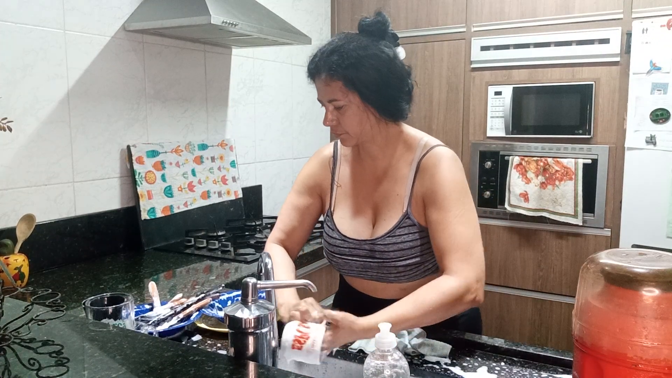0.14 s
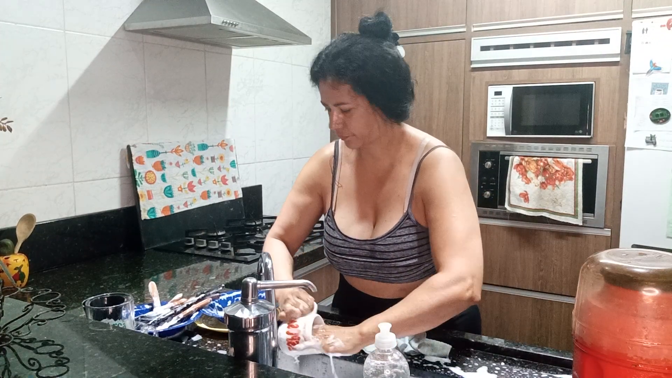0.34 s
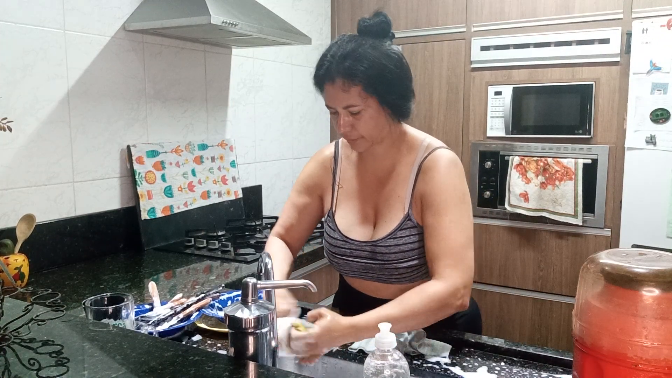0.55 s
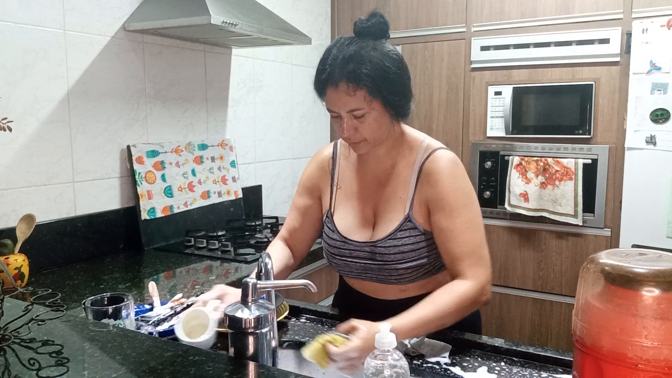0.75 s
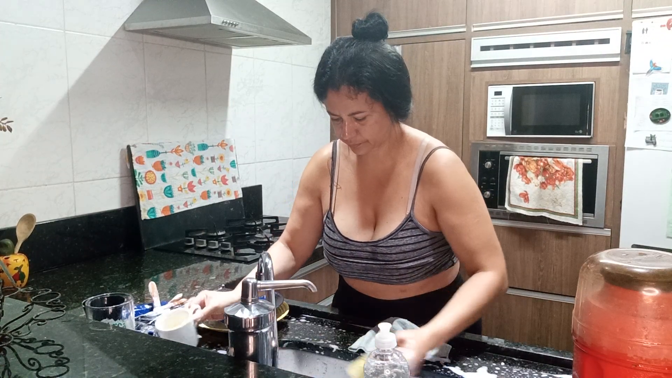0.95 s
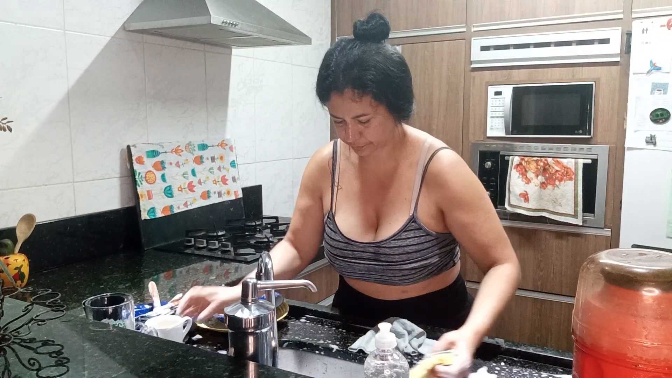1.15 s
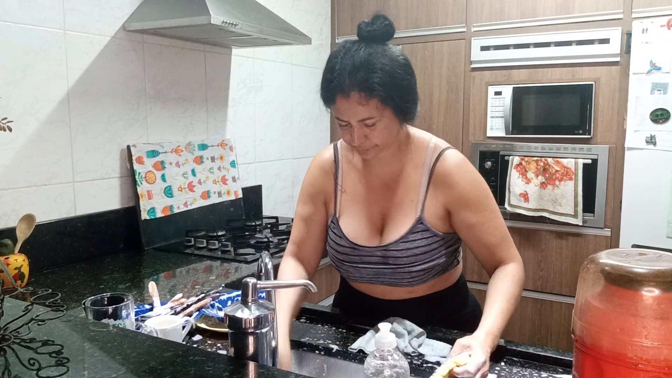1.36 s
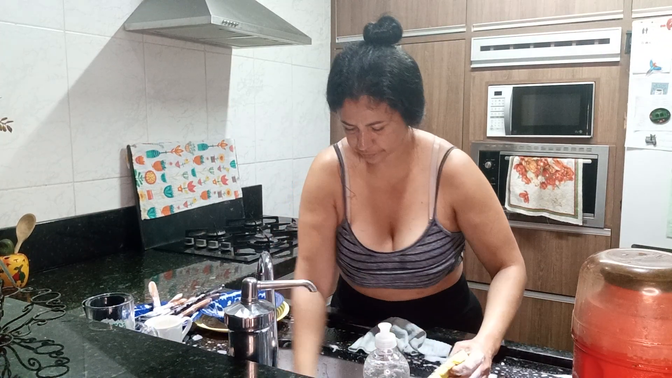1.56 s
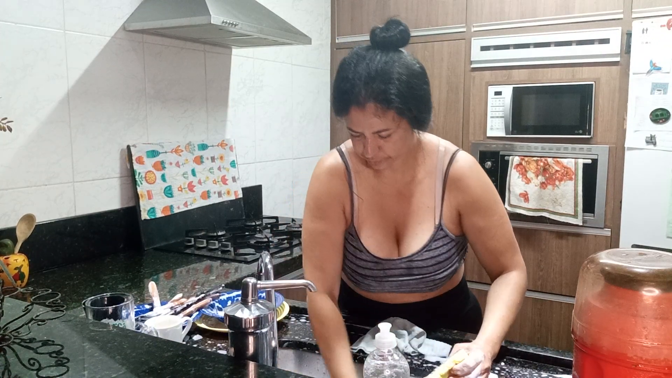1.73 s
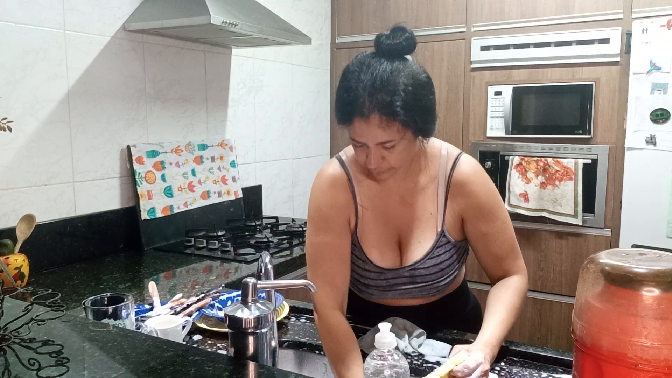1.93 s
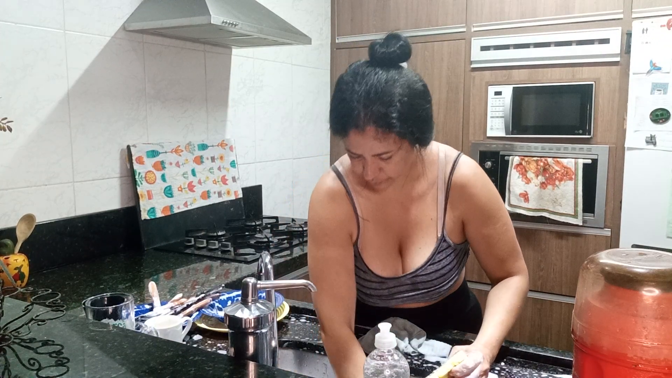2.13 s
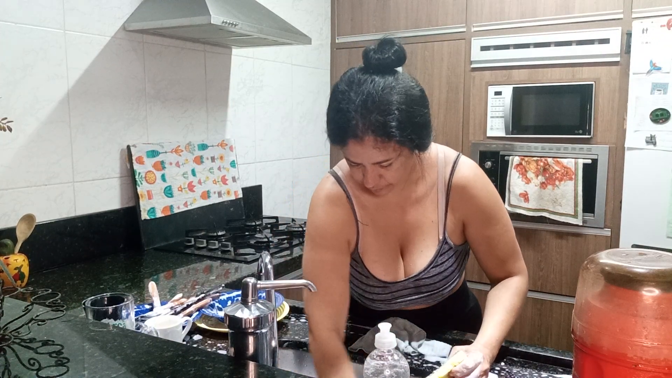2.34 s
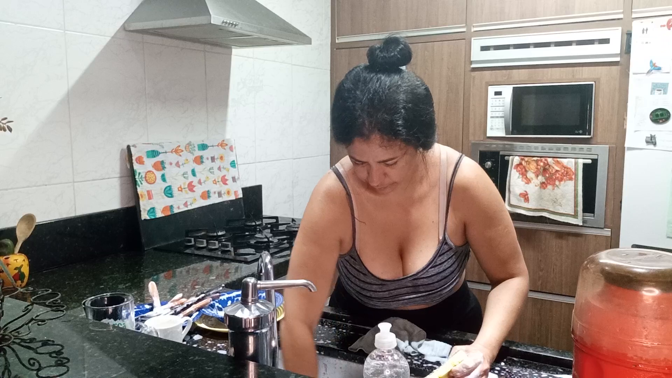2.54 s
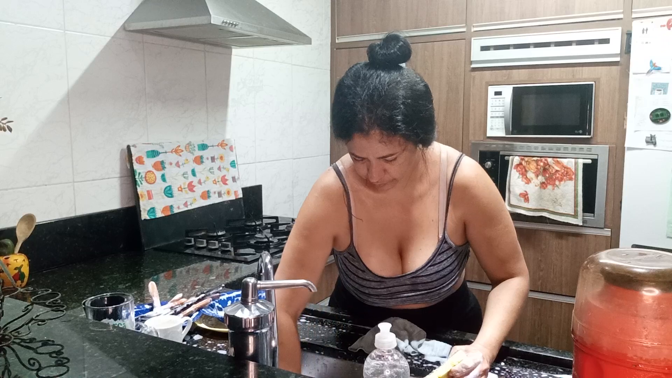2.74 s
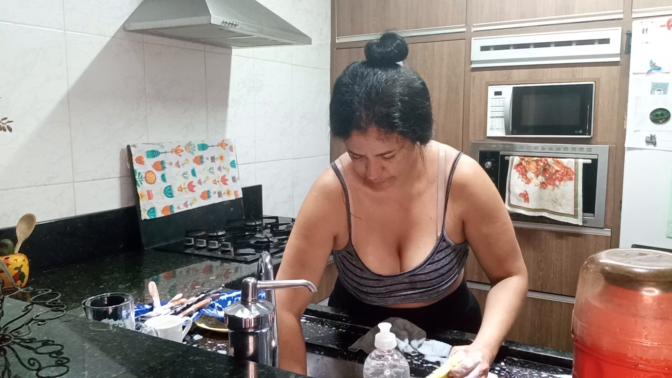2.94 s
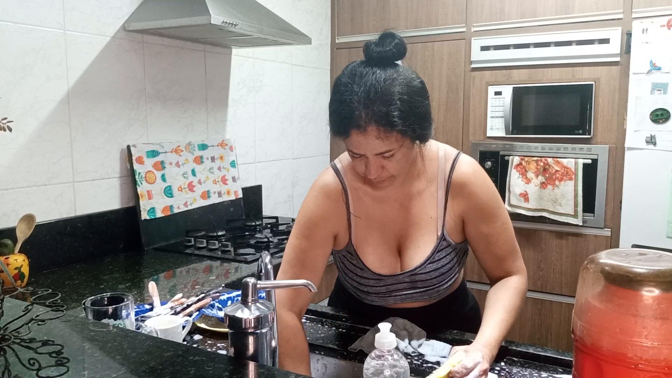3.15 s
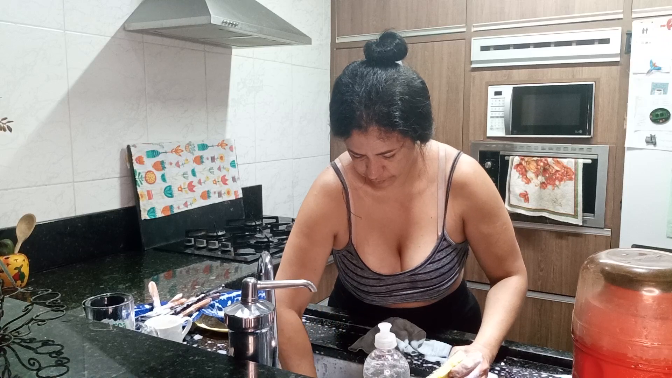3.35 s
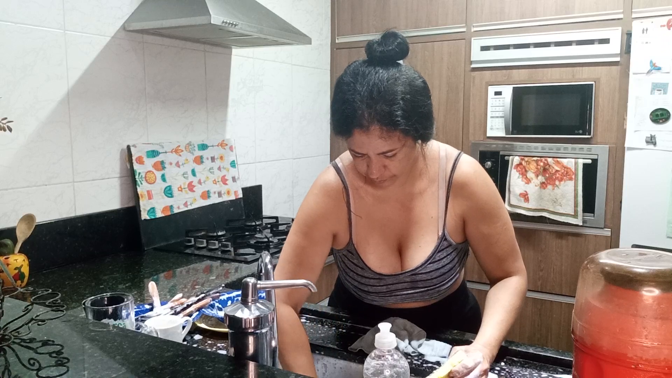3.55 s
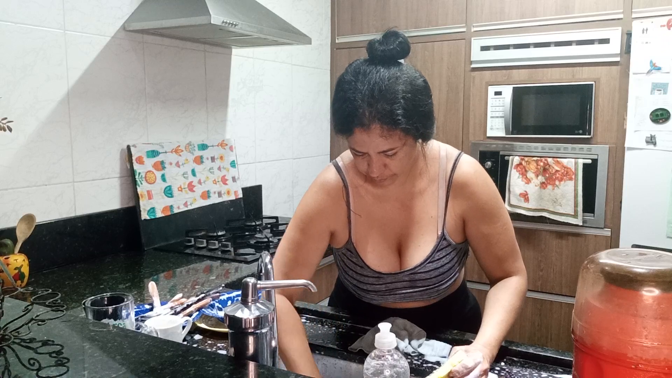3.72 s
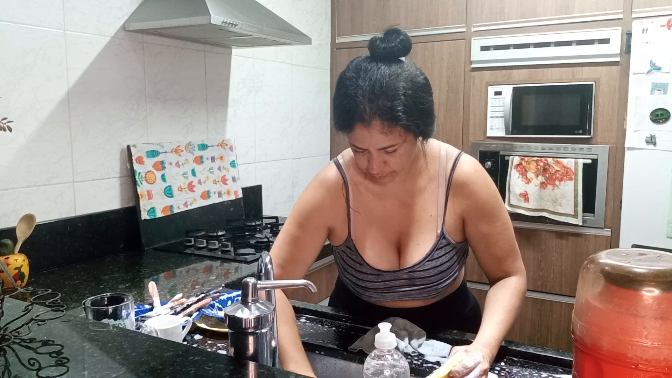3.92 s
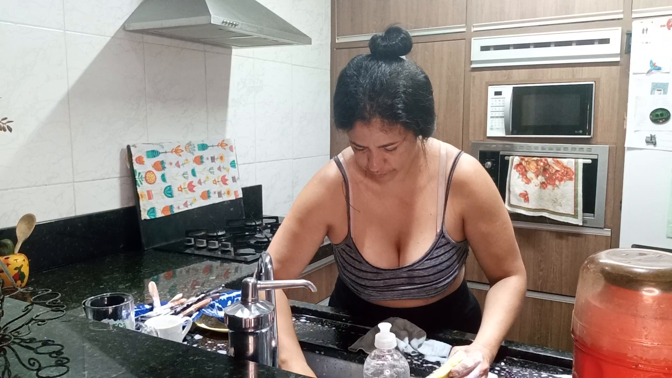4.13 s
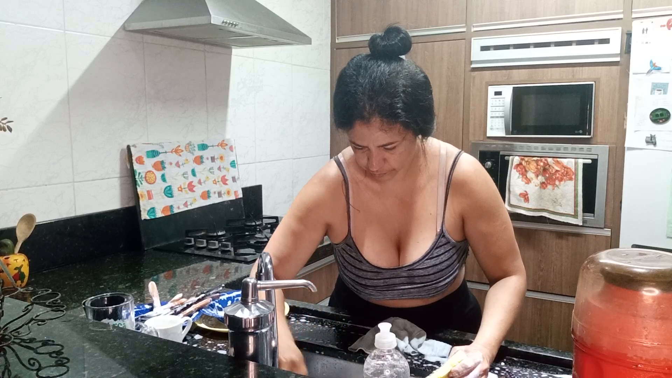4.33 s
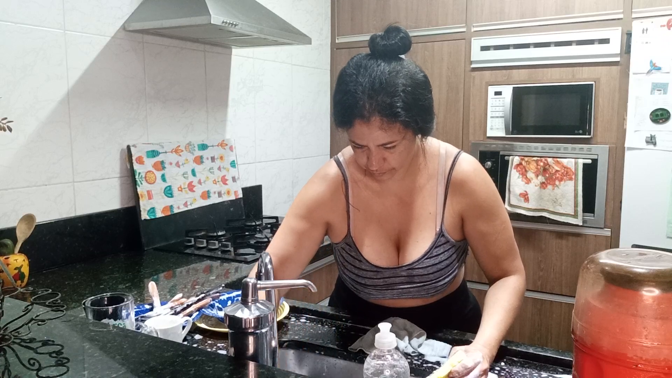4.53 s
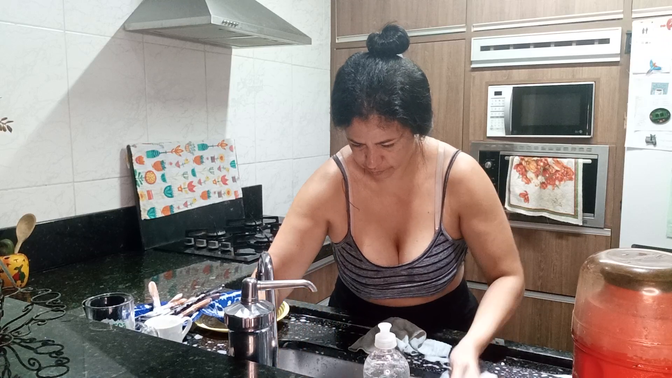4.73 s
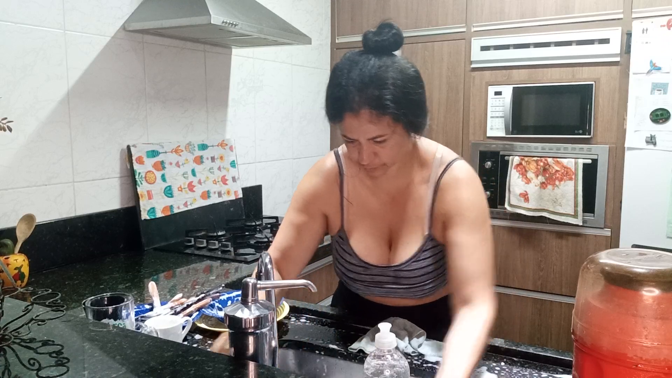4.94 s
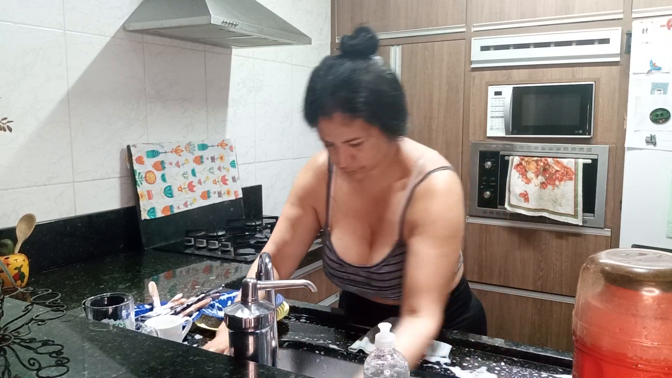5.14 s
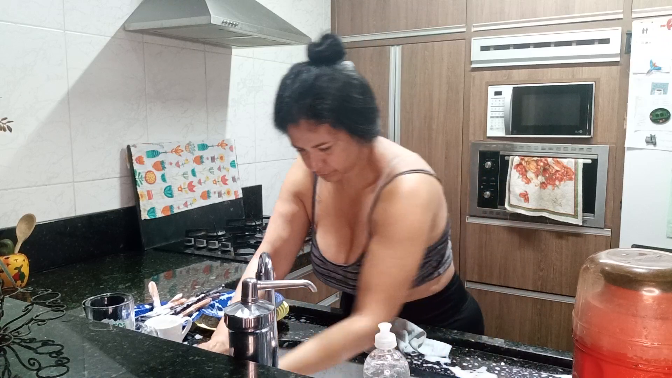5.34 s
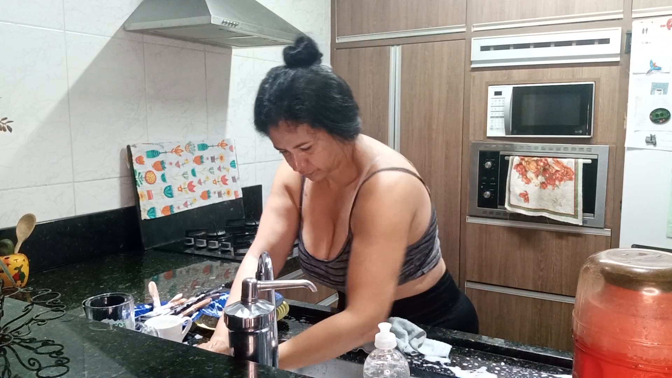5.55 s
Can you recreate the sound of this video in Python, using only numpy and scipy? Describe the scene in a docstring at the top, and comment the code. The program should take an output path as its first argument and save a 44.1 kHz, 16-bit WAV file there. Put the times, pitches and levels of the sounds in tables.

```python
"""A kitchen sink with tiled walls, where dishes are washed by hand. A soapy cup is set down hard on the stone
counter and chinks against other crockery; then hands grope in the basin, where things slide, slosh and knock.
Impacts are causal pulses (cup on stone) or decaying modes (cup, plate, crockery); rubbing and suds are coloured
random grains. Sparse, decaying echoes let the walls ring on after every blow, over room noise and a motor hum."""
import sys
import numpy as np
from scipy import signal
from scipy.fft import rfft, irfft
from scipy.io import wavfile
from scipy.ndimage import uniform_filter1d

SR = 44100
rng = np.random.default_rng(int(sys.argv[2]) if len(sys.argv) > 2 else 0)


def to_wav(sig):
    """Store sig (one row per channel, or 1-D mono) as 16-bit WAV at the path in sys.argv[1].

    Samples outside -1..1 are clipped; the rate is SR.
    """
    pcm = np.clip(np.atleast_2d(sig), -1, 1) * 32767
    pcm = np.round(pcm).astype(np.int16)
    wavfile.write(sys.argv[1], SR, pcm.T)  # frames by channels


N = 250488  # length in samples

# All levels are relative; scene() sets the balance between the layers.
# Spectrum of the room noise: f/Hz, density/dB
AIR_SPECTRUM = [(12, -42.5), (20, -24.5), (59, -10.5), (104, 3.5), (301, -3.5), (1320, -19), (1520, -12.5),
                (2450, -21.5), (3830, -23), (5980, -37.5), (6880, -28.5), (7690, -42), (9360, -31.5),
                (11700, -52), (15900, -39.5)]
AIR_DB = -63.0
HUM_HZ, HUM_DB = 59.6, -62.5  # refrigerator motor: mean frequency and level

# Reverberation of the tiled walls: f/Hz, T60/s, level/dB
WALL_BANDS = [(99.5, 0.57, -7.5), (288, 0.38, -4.5), (730, .55, 0.5), (1810, 0.51, -2.5), (4900, 0.46, -1),
              (8900, 0.15, 0.5), (15860, 0.14, -7.5)]

# Moves of the hands among the dishes: t/s of the peak, build-up/s, sliding level/dB, wet rubbing level/dB,
# suds level/dB
HAND_STROKES = [(.085, 0.079, -55.5, -61, -82), (.316, 0.14, -59.5, -64.5, -85),
                (0.515, 0.086, -53, -55, -69), (.69, .03, -72, -66, -78.5), (1.519, 0.043, -45, -63, -81),
                (1.63, 0.22, -48.5, -46, -80), (1.8, 0.33, -47.5, -47.5, -64.5),
                (2.18, 0.043, -72, -73, -90), (2.43, 0.11, -59, -69, -86),
                (2.611, 0.037, -53.5, -58.5, -70), (2.85, .02, -60.5, -69.5, -92),
                (3.02, .07, -51, -76.5, -85), (3.2, .05, -62, -80, -77), (3.551, .1, -62.5, -60.5, -91),
                (3.68, 0.13, -56.5, -63, -82), (3.83, 0.24, -44.5, -60, -80),
                (4.05, 0.058, -64.5, -68, -73), (4.18, 0.22, -72.5, -60, -84.5),
                (4.309, .12, -50.5, -60.5, -73.5), (4.65, 0.29, -56, -60, -84),
                (4.76, 0.26, -45, -65, -74.5), (4.9, 0.27, -68, -62, -88), (5.01, 0.11, -46, -56.5, -71),
                (5.15, 0.36, -72, -57, -70.5), (5.28, 0.11, -46, -57, -68), (5.39, 0.23, -48, -54, -68.5),
                (5.54, 0.75, -61, -56.5, -73.5), (5.66, 0.16, -48, -58.5, -73)]
# Spectrum of dishes sliding: f/Hz, density/dB
SLIDE_SPECTRUM = [(70, -24.5), (130, -1), (300, -1), (700, -6), (1200, -19), (2000, -36.5), (4000, -55.5)]
# Spectrum of wet rubbing: f/Hz, density/dB
RUB_SPECTRUM = [(470, -28.5), (800, -5.5), (1200, -5), (1380, -6), (1870, -6.5), (2190, -8.5), (2540, -8),
                (6500, -35), (8450, -57.5), (14300, -120)]
# Spectrum of suds bursting: f/Hz, density/dB
SUDS_SPECTRUM = [(3530, -28), (6000, -3), (8020, -6), (9100, 3), (9590, 1), (11600, -24.5), (13600, -28.5),
                 (15100, -17.5), (15900, -20)]
BUILD_DB = 16  # rise over the build-up
SLIDE_FALL_DB_S, RUB_FALL_DB_S, SUDS_FALL_DB_S = 111, 122.5, 111  # dying away after the peak, dB/s
RATTLES_PER_S, RATTLE_DB, RATTLE_T60_S = 51, -4, 0.012  # small clinks of cutlery under the rubbing hands

# Knocks of assorted crockery, cutlery and basin: t/s, level/dB, f/Hz, T60/s, level/dB of the contact tick
# (3 dB is added to the tick)
CROCKERY_KNOCKS = [(0.06, -50, 314, 0.083, -92), (0.093, -45, 1750, 0.031, -66),
                   (0.255, -35, 301, 0.026, -85), (0.301, -47, 1035, 0.076, -67),
                   (0.481, -38.5, 679, 0.028, -77), (0.498, -23, 3230, 0.0023, -58),
                   (0.501, -40, 322, 0.067, -87), (0.513, -55, 2230, 0.032, -65),
                   (0.674, -43.5, 2270, 0.0073, -70), (0.816, -11.5, 367, 0.043, -93),
                   (0.817, -69, 11450, 0.12, -91), (1.083, -23, 1500, .01, -46),
                   (1.089, -19.5, 1006, 0.048, -84.5), (1.124, -36, 920, 0.036, -89.5),
                   (1.456, -34.5, 331.7, 0.57, -59), (1.458, -25.5, 735, 0.01, -87),
                   (1.531, -42.5, 3300, 0.01, -75), (1.54, -49, 8700, 0.005, -53.5),
                   (1.604, -61, 6000, 0.0026, -56), (1.644, -36, 1300, 0.013, -80.5),
                   (1.684, -31, 460, 0.016, -71), (1.727, -37.5, 1173, 0.029, -68),
                   (1.743, -43.5, 354, 0.44, -49), (1.75, -37.5, 2010, 0.018, -90),
                   (1.782, -20, 2720, 0.0037, -54), (1.801, -42, 1890, 0.032, -79),
                   (2.16, -52, 3400, 0.012, -73), (2.329, -59.5, 4980, 0.0087, -68.5),
                   (2.35, -56, 125.8, 0.4, -67.5), (2.419, -60, 4960, 0.005, -70.5),
                   (2.564, -45.5, 1670, 0.03, -82.5), (2.599, -49, 1370, 0.03, -58.5),
                   (2.615, -41, 2560, .012, -76.5), (2.619, -48.5, 3010, 0.015, -90),
                   (2.759, -66, 4720, 0.0073, -67.5), (2.85, -49, 2137, 0.021, -76),
                   (2.989, -56, 4220, 0.009, -70), (2.995, -48, 670, 0.027, -80),
                   (3.025, -43, 302, 0.045, -77.5), (3.459, -49.5, 3250, 0.017, -69),
                   (3.523, -48.5, 1790, 0.014, -89.5), (3.535, -47, 577, 0.024, -83),
                   (3.607, -50, 1864, 0.033, -74), (3.68, -47, 1340, 0.019, -86),
                   (3.721, -48, 368, 0.1, -76), (3.76, -40, 765, 0.048, -87),
                   (3.832, -46.5, 433, 0.13, -71), (3.833, -53.5, 5270, 0.0086, -94),
                   (3.846, -45.5, 890, 0.038, -84), (3.897, -43, 1033, 0.019, -86),
                   (3.93, -58, 8500, 0.0052, -66), (3.977, -52.5, 1390, 0.024, -91),
                   (4.036, -32, 3440, 0.0039, -60.5), (4.088, -48.5, 2125, 0.026, -62),
                   (4.245, -40, 220, 0.043, -67), (4.25, -46, 2090, 0.025, -95),
                   (4.305, -40.5, 1257, 0.024, -82), (4.718, -17, 423, 0.0095, -49),
                   (4.78, -52, 64.2, 0.57, -61), (5.0, -32.5, 267, 0.023, -56),
                   (5.258, -33.5, 314, 0.11, -57), (5.323, -55, 302, 0.027, -67),
                   (5.335, -29.5, 953, 0.011, -56), (5.614, -24, 230, 0.019, -90),
                   (5.631, -37.5, 163.5, 0.11, -79)]
# Blows on a small plate in the basin: t/s, level/dB
PLATE_BLOWS = [(4.716, -24.5)]
# Modes of the plate: f/Hz, level/dB, T60/s
PLATE_MODES = [(1400, -23.5, 0.0061), (2480, 0, 0.0098), (2897, -4, 0.017), (3040, 4.5, 0.017),
               (3250, -23, .2), (2344, -9.5, 0.0062)]
# Spectrum of the contact ticks: f/Hz, density/dB
TICK_SPECTRUM = [(300, -10), (1000, 4.5), (3000, 6), (5500, -0.5), (8000, -9.5), (9200, -3), (11500, -25),
                 (15000, -18.5)]

# Blows of the cup on the stone: t/s, level/dB
CUP_LANDINGS = [(.818, -3), (1.09, -11), (1.113, -25), (1.135, -17.5), (1.255, -30)]
# Spectrum of thick ceramic on stone: f/Hz, density/dB
STONE_SPECTRUM = [(35, -55.5), (85, -26.5), (156, -5.5), (514, -11.5), (578, -10), (713, -7), (783, -9.5),
                  (1090, -6), (1580, -8), (2460, -13.5), (3250, -20.5), (4720, -47), (11700, -64),
                  (13500, -73.5), (15900, -68)]
GRAZE_S, GRAZE_DB = 0.002527, -17.5  # an edge touches this long before the blow
REBOUND_S, REBOUND_DB, REBOUND_FADE_DB = .0102, -15, -2  # chatter of the base: spacing, first level, change at each

# Blows on the rim of the cup: t/s, level/dB
RIM_BLOWS = [(1.086, -9), (1.114, 7)]
# Lower member of each mode pair of the cup: f/Hz
CUP_MODE_HZ = [1641, 3090, 3932, 5120, 5681, 7483, 8796, 9230, 10150, 10840, 12095, 13722, 14959, 15706]
# Beating of each mode pair: level/dB, T60/s, beat f/Hz, signed relative height of the twin
CUP_MODE_PAIRS = [(-16, 0.53, 7.65, -0.52), (-40, 0.44, 12, 0.81), (-33, 0.45, 10.5, 0.75),
                  (-49.5, 0.39, 2.5, 0.92), (-50, 0.45, 7.5, -0.52), (-49.5, 0.53, 12, -0.5),
                  (-58.5, 0.27, 9, .3), (-46, 0.4, 9.4, 0.63), (-57, .34, 7.4, -.35), (-56, .35, 13, 0.25),
                  (-62.5, 0.28, 16, 0.14), (-76, .3, 4, 0.2), (-70.5, .3, 4, 0.63), (-69.5, .3, 3, .4)]
# Spectrum of glaze cracking against glaze: f/Hz, density/dB
CRACK_SPECTRUM = [(1500, -33), (3000, 3), (5000, -4), (7000, -19.5), (9200, -5.5), (12000, -24.5),
                  (15000, -22.5)]
CRACK_DB = -43
SETTLE_S, SETTLE_DB_S, SETTLED_DB = 1.33, 301, -10  # the cup comes to rest: lowest pair damped from t, rate, floor

EDGE_HZ = 15900  # upper band limit


def amp(db):
    """Level definition: converts decibels to an amplitude ratio."""
    return 10 ** (np.asarray(db) / 20)


def evened(x):
    """Power normalisation: scales to rms 1."""
    return x / np.sqrt(np.mean(x ** 2) + 1e-20)


def read(points, hz, column=1):
    """Logarithmic frequency scale: interpolates a table column along it."""
    rows = np.transpose(points)
    return np.interp(np.log(hz + 1), np.log(rows[0] + 1), rows[column])


def add(mix, s, sound):
    """Superposition: adds a sound into the mix at second s."""
    part = mix[round(s * SR):][:len(sound)]
    part += sound[:len(part)]


def coloured(x, spectrum):
    """Linear filtering: shapes a long signal by a spectrum, to rms 1."""
    gain = amp(read(spectrum, np.fft.rfftfreq(len(x), 1 / SR)))
    return evened(irfft(rfft(x) * gain, len(x)))


def air():
    """Stationary noise of the room, and a motor hum under slow amplitude and frequency modulation."""
    noise = rng.standard_normal((2, N))
    waver = evened(uniform_filter1d(uniform_filter1d(noise, 3000), 3000))
    phase = 2 * np.pi * np.cumsum(HUM_HZ + 1.3 * waver[1]) / SR
    hum = amp(HUM_DB + 1.4 * waver[0]) * np.sin(phase)
    return amp(AIR_DB) * coloured(rng.standard_normal(N), AIR_SPECTRUM) + hum


def kitchen(x):
    """Reverberation: sparse echoes of random sign, each band decaying at its own rate; three tails take turns."""
    at = np.arange(100, SR // 2 + 8000, 20) + rng.integers(0, 20, (3, 1498))
    taps = np.zeros((3, SR))
    np.put_along_axis(taps, at, rng.choice([-1., 1.], at.shape), 1)
    hz, t, bands = signal.stft(taps, SR, nperseg=256)
    level_db = read(WALL_BANDS, hz, column=2)[:, None]
    decay_db = 60 * t / read(WALL_BANDS, hz)[:, None]
    tails = signal.istft(bands * amp(level_db - decay_db), SR, nperseg=256)[1]
    tails[:, :100] = 0  # no echo before the first reflection
    turn = np.arange(N) / SR * 2 * np.pi * 1.3 + np.arange(3)[:, None] * np.pi / 3
    echoes = signal.fftconvolve(x * np.cos(turn), tails / np.linalg.norm(tails[0]), axes=1)
    return echoes[:, :N].sum(0)


def rattle():
    """Random excitation of damped resonators: sparse small clinks at a dozen pitches, rms 1."""
    t, hz = np.arange(SR // 20) / SR, np.geomspace(900, 3100, 12)
    struck = rng.random((len(hz), N)) < RATTLES_PER_S / len(hz) / SR
    blows = struck * rng.standard_normal((len(hz), N))
    rise = np.minimum(t / 0.0008, 1)
    rings = amp(-60 * t / RATTLE_T60_S) * np.sin(2 * np.pi * hz[:, None] * t) * rise
    return evened(signal.oaconvolve(blows, rings, axes=1)[:, :N].sum(0))


def hands(slips_per_s=900, pops_per_s=1200, size_db=4, smooth=.8):
    """Stick-slip friction of sliding dishes below, wet rubbing and bursting suds above, swelling at each move."""
    size = amp(size_db * np.minimum(rng.exponential(1, (2, N)), 4)) * rng.standard_normal((2, N))
    grains = size * (rng.random((2, N)) < np.array([[slips_per_s], [pops_per_s]]) / SR)
    slips, pops = (evened(g) + smooth * rng.standard_normal(N) for g in grains)
    foam = pops + 2.5 * rng.standard_normal(N)  # the finest bubbles merge into hiss
    t, power = np.arange(0, N / SR + .01, .002), 0
    falls = np.array([[SLIDE_FALL_DB_S], [RUB_FALL_DB_S], [SUDS_FALL_DB_S]])
    for s, build_s, *levels_db in HAND_STROKES:
        tops_db = np.array(levels_db)[:, None]
        before_db = BUILD_DB * np.maximum(s - t, 0) / abs(build_s)
        after_db = falls * np.maximum(t - s, 0)
        power = power + amp(tops_db - before_db - after_db) ** 2
    slide_gain, rub_gain, suds_gain = [np.interp(np.arange(N) / SR, t, np.sqrt(p)) for p in power]
    sliding = slide_gain * coloured(slips, SLIDE_SPECTRUM)
    rubbing = rub_gain * (coloured(pops, RUB_SPECTRUM) + amp(RATTLE_DB) * rattle())
    return sliding + rubbing + suds_gain * coloured(foam, SUDS_SPECTRUM)


def knocks(side_db=-6):
    """Modal decay: a damped mode, a quicker neighbour and a tick; gives near sound and what reaches the walls."""
    t, out = np.arange(SR // 3) / SR, np.zeros((2, N))
    grit = coloured(rng.standard_normal(N), TICK_SPECTRUM)
    plate = [(s, db + d, hz, t60, -np.inf) for s, db in PLATE_BLOWS for hz, d, t60 in PLATE_MODES]
    rows = CROCKERY_KNOCKS + plate
    nearby = rng.uniform(.92, 1.08, (len(rows), 1))  # frequency ratio of the neighbour
    for (s, db, hz, t60, tick_db), near in zip(rows, nearby):
        fade = amp(-60 * t / max(t60, .002))
        neighbour = amp(side_db) * fade * np.sin(2 * np.pi * hz * near * t)
        ring = np.sin(2 * np.pi * hz * t) + neighbour
        rise = np.sin(np.pi / 2 * np.minimum(t / (0.0012 + 1.0 / hz), 1)) ** 2  # the blow is soft and wet
        sound = amp(db) * ring * fade * rise
        tick_gain = amp(tick_db + 3 - 60 * t / 0.02) * np.minimum(t / 0.00069, 1)
        tick = tick_gain * np.roll(grit, -round(s * SR))[:len(t)]
        add(out[0], s, sound + tick)
        # long low rings stay in the basin and counter
        add(out[1], s, sound * min(0.11 / t60, hz / 600, 1) + tick)
    return out


def landings():
    """Minimum-phase impact: each contact is a short causal pulse, dull as ceramic on stone; graze, blow, rebounds."""
    density_db = read(STONE_SPECTRUM, abs(np.fft.fftfreq(4096, 1 / SR)))
    log_gain = np.log(amp(np.maximum(density_db, -100)))
    pulse = np.fft.ifft(np.exp(log_gain - 1j * signal.hilbert(log_gain).imag)).real[:2048]
    pulse = pulse / abs(pulse).max()
    out, k = np.zeros(N), np.arange(6)
    after_s = np.r_[-GRAZE_S, 0, REBOUND_S * (k + 1)]
    under_db = np.r_[GRAZE_DB, 0, REBOUND_DB + REBOUND_FADE_DB * k]
    # only the rebounds after the first are irregular
    irregular = (after_s > REBOUND_S * 1.5)[:, None]
    uneven = rng.uniform(-1, 1, (len(CUP_LANDINGS), len(after_s), 2)) * irregular
    for (s, db), chance in zip(CUP_LANDINGS, uneven):
        for dt, d, (late, loud) in zip(after_s, under_db, chance):
            add(out, s + dt + .3 * REBOUND_S * late, amp(db + d + 4 * loud) * pulse)
    return out


def cup():
    """Beating of split modes: pairs start in step or opposed, by the twin's sign, and beat; gives ring and crack."""
    t, out = np.arange(SR * 3 // 4) / SR, np.zeros((2, N))
    modes = []
    for hz, (db, t60, beat, twin) in zip(CUP_MODE_HZ, CUP_MODE_PAIRS):
        pair = np.sin(2 * np.pi * hz * t) + twin * np.sin(2 * np.pi * (hz + beat) * t)
        modes.append(amp(db - 60 * t / t60) * pair)
    lowest = modes[0] * np.minimum(t / 0.057, 1)  # builds up as the cup rattles
    upper = sum(modes[1:])
    crack = amp(CRACK_DB - 60 * t / 0.035) * coloured(rng.standard_normal(len(t)), CRACK_SPECTRUM)
    rise = np.minimum(t / .002, 1)
    for s, db in RIM_BLOWS:
        damping = amp(np.clip(SETTLE_DB_S * (SETTLE_S - s - t), SETTLED_DB, 0))
        add(out[0], s, amp(db) * rise * (upper + lowest * damping))
        add(out[1], s, amp(db) * crack * rise)
    return out


def scene():
    """Superposition of direct and reverberant sound, each source with its own share of either."""
    thud, (ring, crack), (knock, far), rub = landings(), cup(), knocks(), hands()
    to_walls = amp(6.0) * thud + amp(-17.5) * ring + amp(7.0) * crack + amp(1.5) * far + amp(-10.0) * rub
    direct = thud + ring + crack + amp(2.0) * knock + amp(-6) * rub
    return (direct + kitchen(to_walls) + air())[None]


def record(dry):
    """Band limitation: a linear-phase low-pass removes what lies above the edge."""
    lowpass = signal.firwin(511, EDGE_HZ, window=("kaiser", 9), fs=SR)
    return signal.oaconvolve(dry, lowpass[None], "same")


dry = scene()
out = record(dry)
to_wav(out)
```